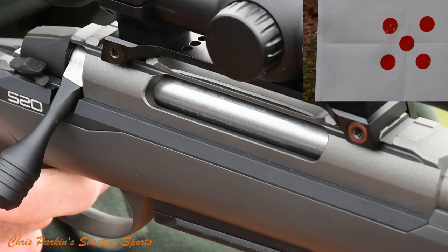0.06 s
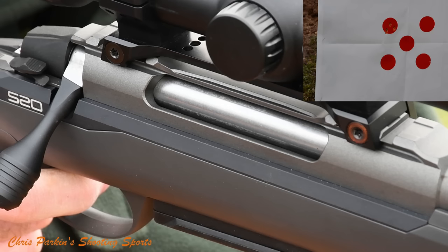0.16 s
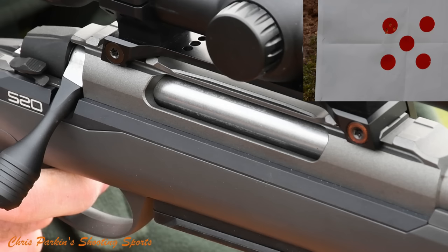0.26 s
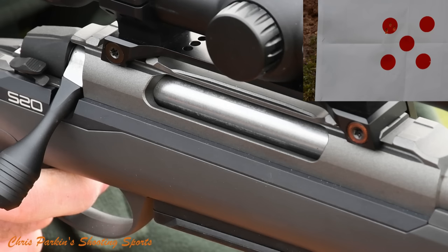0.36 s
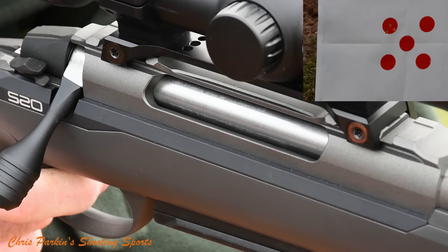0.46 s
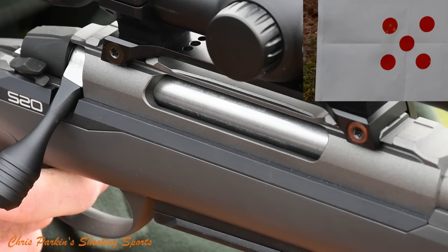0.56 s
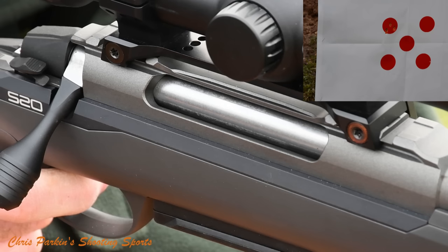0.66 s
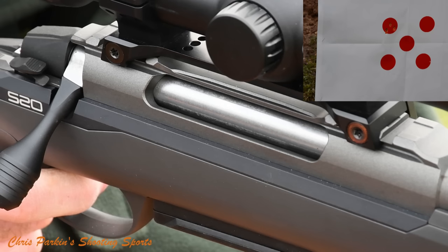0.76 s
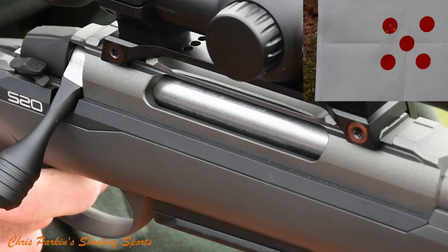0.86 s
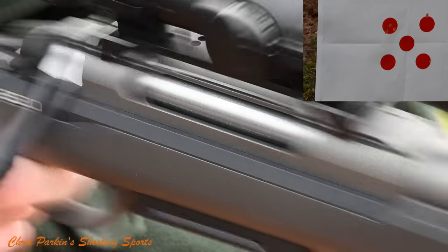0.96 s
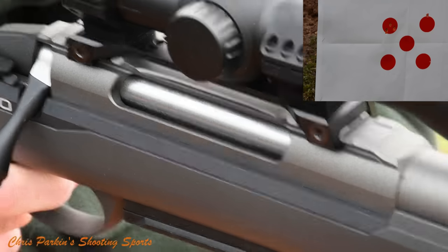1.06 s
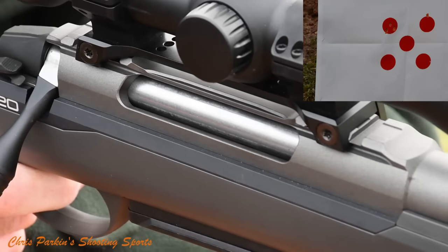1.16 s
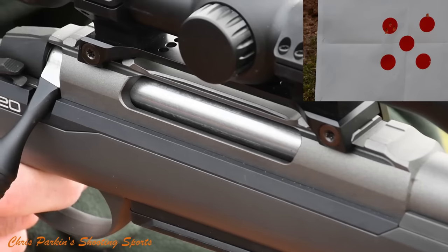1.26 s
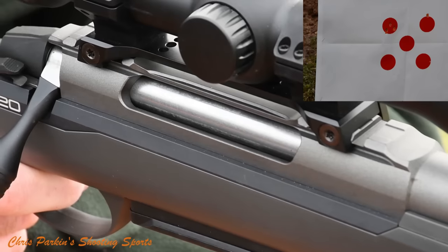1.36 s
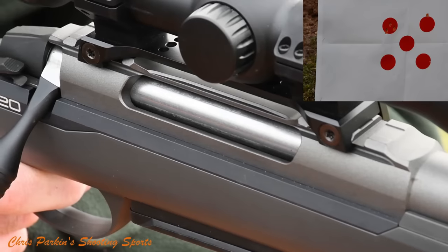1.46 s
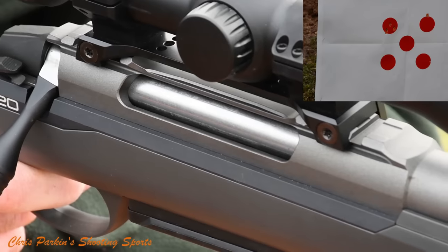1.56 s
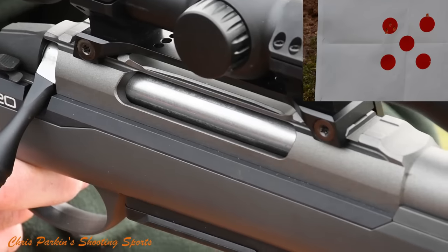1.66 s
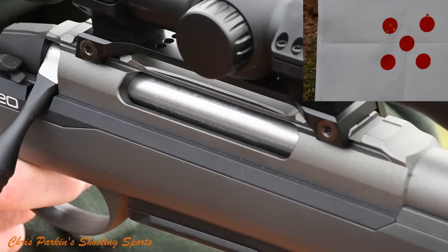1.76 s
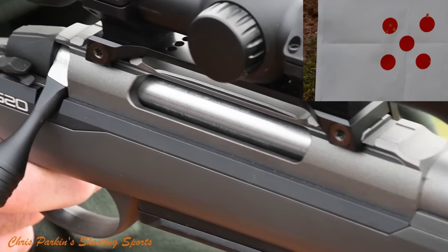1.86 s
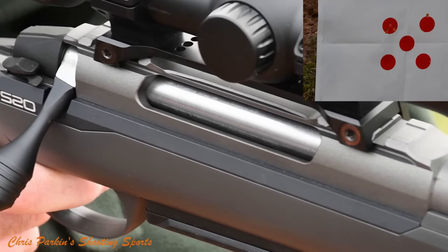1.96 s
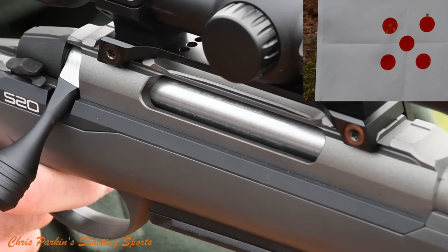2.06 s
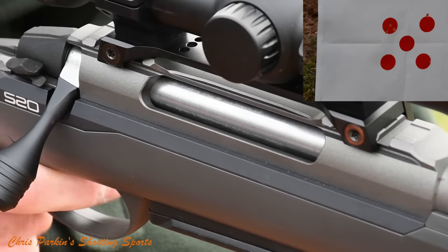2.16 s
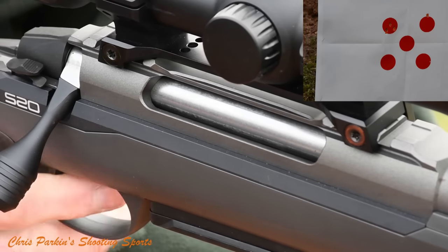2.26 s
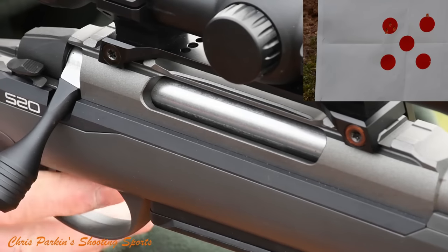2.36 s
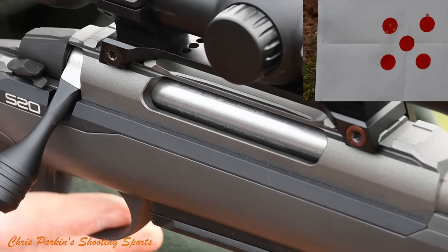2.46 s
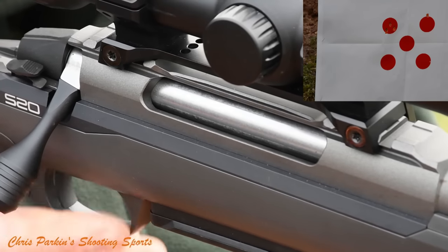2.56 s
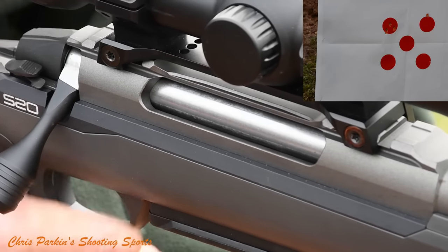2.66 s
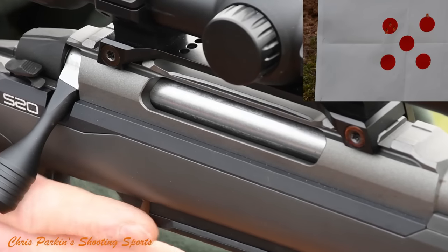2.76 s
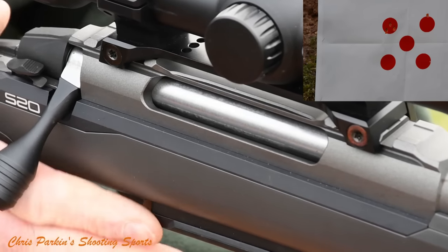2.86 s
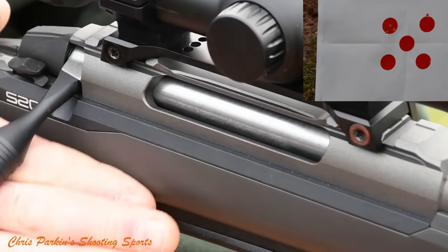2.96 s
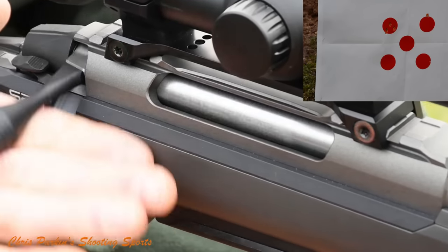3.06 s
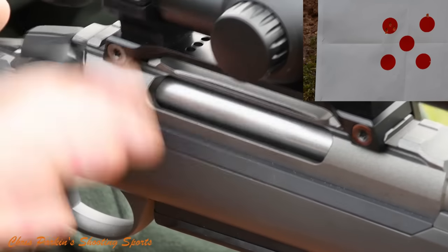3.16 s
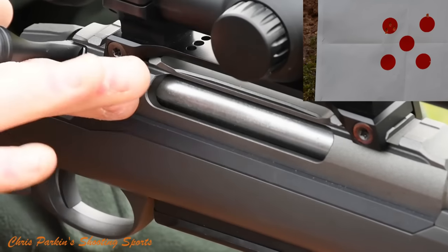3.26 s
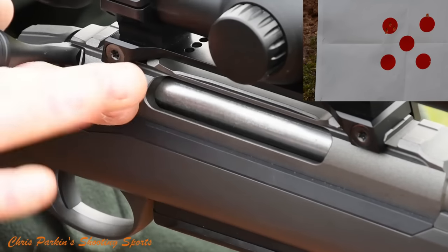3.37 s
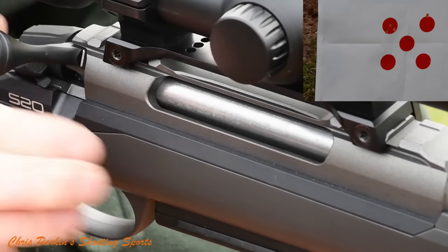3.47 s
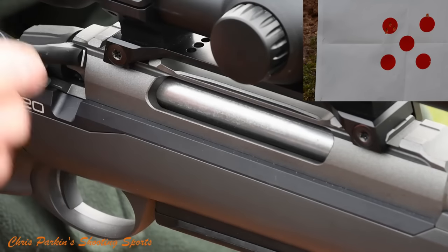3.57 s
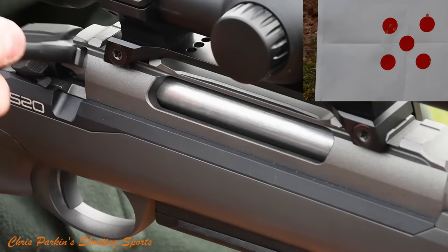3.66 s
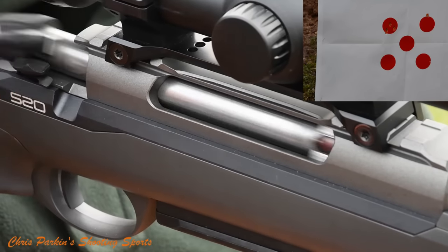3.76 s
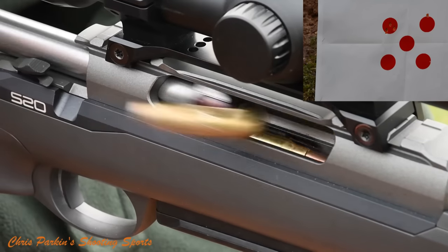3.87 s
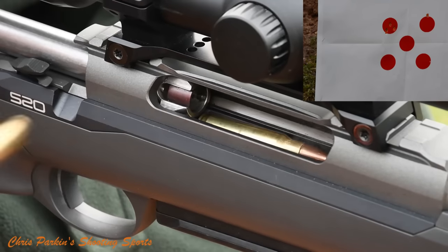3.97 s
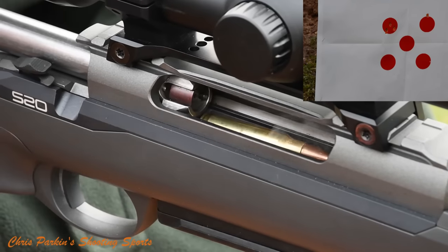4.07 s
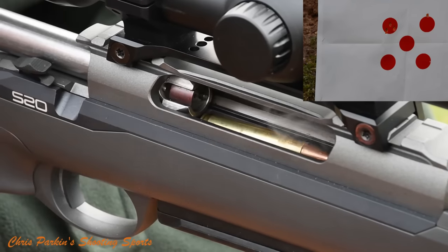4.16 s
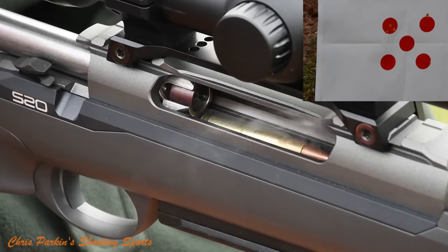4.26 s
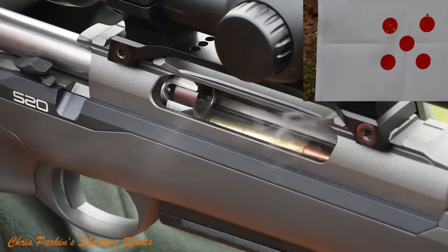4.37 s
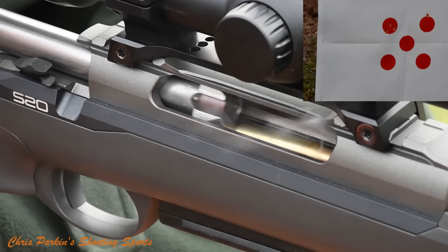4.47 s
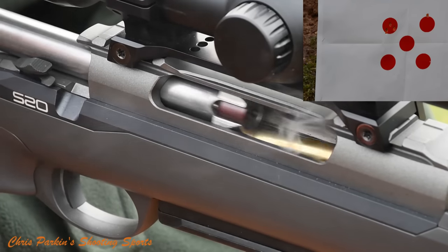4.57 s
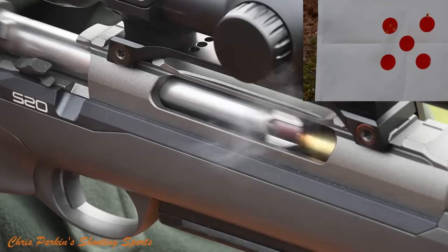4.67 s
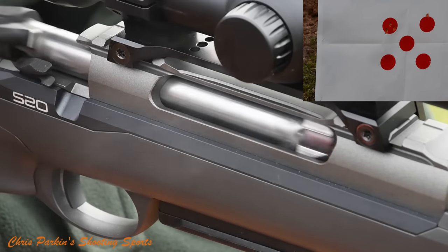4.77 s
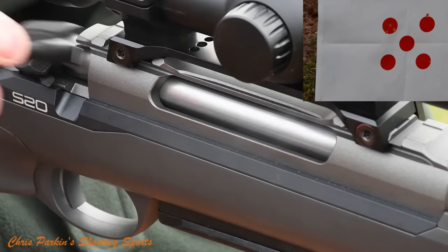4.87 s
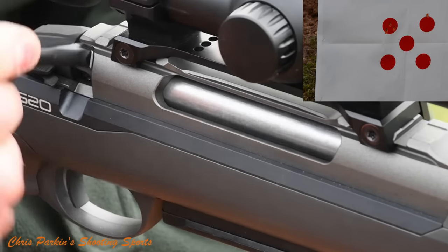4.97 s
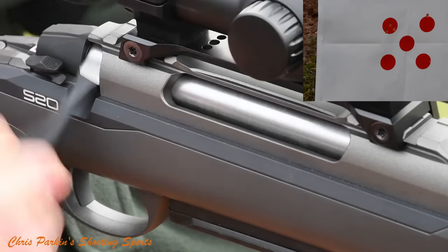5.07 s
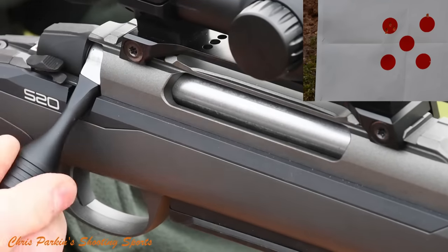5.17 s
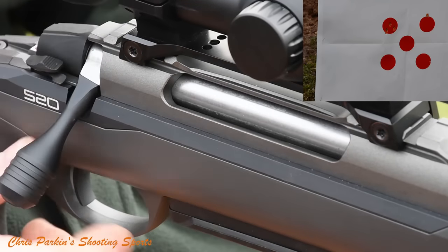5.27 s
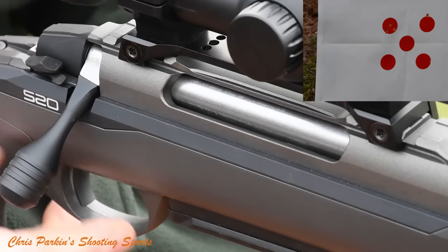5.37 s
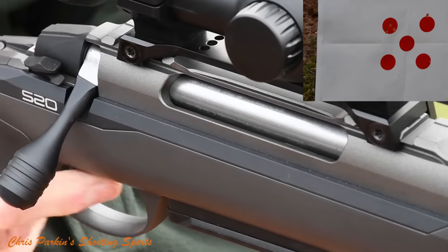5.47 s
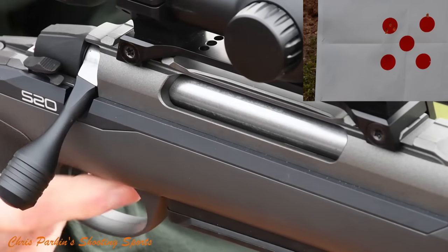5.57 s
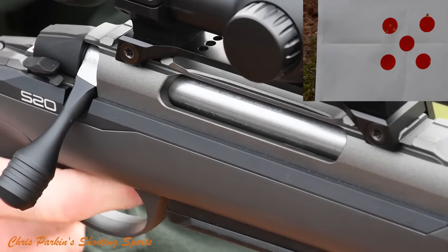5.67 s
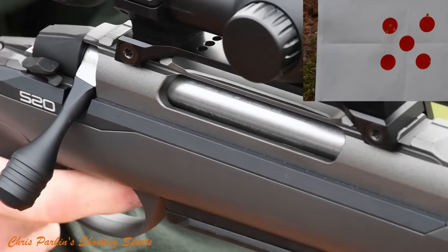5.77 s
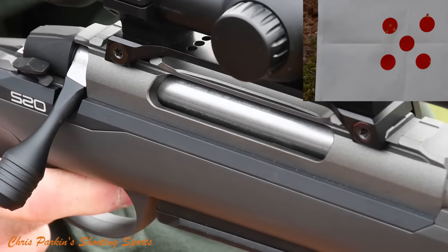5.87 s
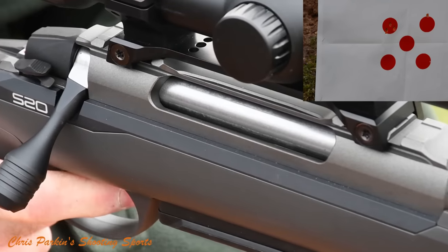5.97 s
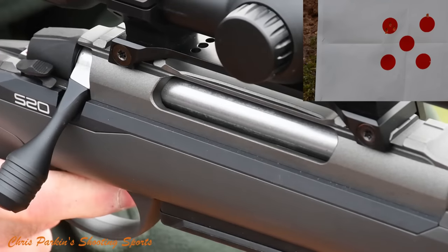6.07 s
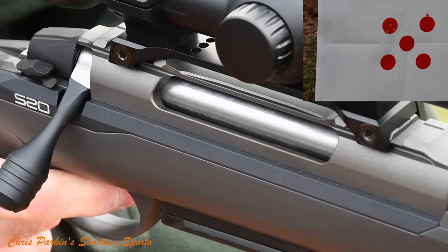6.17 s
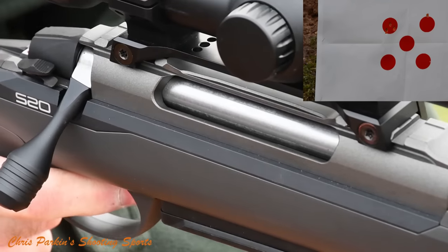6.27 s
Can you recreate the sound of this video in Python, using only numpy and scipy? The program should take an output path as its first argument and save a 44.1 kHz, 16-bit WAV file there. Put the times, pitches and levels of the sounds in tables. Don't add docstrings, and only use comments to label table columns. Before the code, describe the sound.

Outdoors, a low distant traffic hum for a second, then a violent close rifle shot that overloads the microphone. Echoes slap back and roll off, with a dull thud half a second later. Light metal ticks of handling follow, then a hard bolt-lift clack, a sharp clack as it is drawn back, the empty case knocking down, and a sliding, clicking push home ending in a firm lock.

```python
import sys
import numpy as np
from scipy import signal
from scipy.fft import rfft, irfft
from scipy.io import wavfile
from scipy.ndimage import map_coordinates

SR = 44100
rng = np.random.default_rng(int(sys.argv[2]) if len(sys.argv) > 2 else 0)


def generate_wav(sig):
    pcm = np.round(np.clip(np.atleast_2d(sig).T, -1, 1) * 32767).astype(np.int16)
    wavfile.write(sys.argv[1], SR, pcm)


def decibels_to_gain(level_db):
    exponent = np.asarray(level_db, float) / 20
    return 10 ** exponent


N = 279153
SHOT_S = 1.003

# f/Hz, level/dB
LUGS = [(646, -9), (1130, -1), (1293, -6), (1862, 0), (2100, -2)]
STOP = [(775, 2), (1000, -11), (1245, -7), (1440, -11), (1700, -8), (2060, -4)]
BENCH = [(480, -9), (590, -11), (694, -3), (820, -5), (1100, 0), (1390, -9)]
LEVER = [(520, -16), (802, -3), (1040, -5), (1430, -5), (1680, -2)]
MOUTH = [(760, -10), (1210, -8), (1530, -3), (1780, -1), (2700, -5), (3250, -11)]
BREECH = [(930, -3), (1200, 2), (1780, -8), (2970, 0), (4480, -6)]


def noise(count=N):
    return rng.standard_normal(count)


def fade(t, t60):
    return np.exp(-np.log(1000) * t / t60)


def band(x, hz, octaves, order=1):
    edges_hz = np.clip([hz * 2 ** (-octaves / 2), hz * 2 ** (octaves / 2)], 10, .49 * SR)
    return signal.sosfilt(signal.butter(order, edges_hz, "bandpass", fs=SR, output="sos"), x)


def coloured(points, count=N):
    hz, db = np.transpose(points)
    bins_hz = np.arange(1, count // 2 + 2) * SR / count
    gain = decibels_to_gain(np.interp(np.log(bins_hz), np.log(hz), db))
    x = irfft(rfft(noise(count=count)) * gain, count)
    return x / x.std()


def walk(rate_hz):
    return map_coordinates(noise(count=1024), [np.arange(N) * (rate_hz / SR)], order=1, mode="wrap")


def add(out, s, x):
    i = int(s * SR)
    out[i:i + len(x)] += x[:N - i]


def peak(x, db):
    return x * decibels_to_gain(db) / np.abs(x).max()


def land():
    # f/Hz, level/(dB per Hz)
    traffic = [(20, -20.5), (32, -17), (48, -8), (64, 2.5), (90, -4.5), (130, -5), (250, -5.5), (420, -14),
               (700, -13), (1050, -14), (1500, -22), (2200, -31.5), (3300, -37.5), (15000, -41.5)]
    traffic_db, hiss_db = -41.5, -63
    bed = coloured(traffic)
    bass = band(bed, 90, 1.0)
    wandering = bed + bass * (decibels_to_gain(1.9 * walk(5)) - 1)
    far = decibels_to_gain(traffic_db) * wandering * decibels_to_gain(.6 * walk(1.5))
    return far + decibels_to_gain(hiss_db) * band(noise(), 8500, 0.86)


def hollow():
    hum_hz, hum_db, rise_s, t60_s = 330, -57, 1.2, 18
    since_s = np.maximum(np.arange(N) / SR - SHOT_S, 0)
    hum = band(noise(), hum_hz, .16, order=2) * np.minimum(since_s / rise_s, 1) * fade(since_s, t60_s)
    return decibels_to_gain(hum_db) * hum / hum.std()


def roll():
    # t/s, level/dB
    decay = [(1.028, -7.5), (1.09, -20), (1.122, -8), (1.152, -7), (1.165, -11), (1.2, -10), (1.27, -14),
             (1.42, -21), (1.6, -28), (1.8, -36), (2.1, -47.5), (3.0, -57.5), (4.0, -60), (6.3, -64)]
    # f/Hz, level/(dB per Hz)
    spectrum = [(24, -49.5), (40, -20), (265, -4), (449, -5.5), (605, -1), (703, -2.5), (1730, -2),
                (5850, -9), (9300, -20), (15500, -42)]
    air_db_per_s, air_from_s, air_max_db = 18.5, .1, 23
    t, out = np.arange(N) / SR, 0
    ridges_db = 0.7 * walk(30) + 1.4 * walk(200)
    db = np.interp(t, *np.transpose(decay), left=-200)
    air_db = np.minimum(air_db_per_s * (t - SHOT_S - air_from_s), air_max_db)
    scatter = coloured(spectrum)
    for hz in 60 * 2 ** np.arange(0, 8.1, .25):
        part = band(np.roll(scatter, rng.integers(N)), hz, .25, order=2)
        low_loss = .2 * np.clip(np.log2(1100 / hz), 0, 1.5)
        loss_db = air_db * ((hz / 4000) ** 1.6 - 0.3082 + low_loss)
        out = out + part * decibels_to_gain(db - loss_db + ridges_db + 1.2 * walk(50))
    return out


def soft_blows(rows):
    out, t = np.zeros(N), np.arange(SR // 5) / SR
    for s, db, hz, t60 in rows:
        swell = np.minimum(t / 0.0039, 1) ** 2 * fade(np.maximum(t - .005, 0), t60)
        add(out, s, peak(swell * np.sin(2 * np.pi * hz * (t - .0045)), db))
    return out


def berm_thuds():
    # t/s, peak/dB, f/Hz, t60/s
    thuds = [
        (1.4455, -2, 355, 0.0094),
        (1.46, -11, 362, 0.0098),
        (1.468, -16, 430, 0.02),
        (1.621, -21.5, 256, 0.013),
        (1.825, -27.5, 337, 0.02),
        (1.86, -18, 277, 0.016),
        (2.041, -24.5, 258, 0.023),
    ]
    return soft_blows(thuds)


def rifle_rocks():
    # t/s, peak/dB, f/Hz, t60/s
    rocks = [(3.213, -26.5, 90, 0.15), (3.217, -13.5, 338, 0.05), (3.213, -23, 175, .06),
             (3.212, -11, 790, 0.029), (3.216, -18, 440, 0.09), (3.214, -20, 560, .11),
             (3.963, -19.5, 320, 0.067), (4.19, -25.5, 325, 0.043), (4.217, -18, 400, .06),
             (4.684, -36, 128, 0.068), (4.943, -29, 200, .06), (5.1445, -24, 62, .12),
             (5.137, -25, 320, .05), (3.864, -31, 280, .04), (4.215, -26, 230, .06),
             (1.697, -30.5, 170, .03), (1.875, -32.5, 250, .02)]
    return soft_blows(rocks)


def creaks():
    # t/s, peak/dB, f/Hz
    ticks = [(1.915, -41, 7030), (1.989, -41, 6000), (2.035, -44, 3520), (2.245, -50.5, 5000),
             (3.255, -53, 10500), (3.307, -51, 6030), (3.535, -46, 5000), (3.561, -47, 8000),
             (3.609, -45, 6000), (3.628, -46, 9000), (3.633, -44, 5900), (3.775, -46, 8000),
             (5.031, -46, 5470), (4.2405, -24, 8800), (4.349, -40, 8500), (4.378, -43, 6300)]
    out, t = np.zeros(N), np.arange(SR // 10) / SR
    for s, db, hz in ticks:
        add(out, s, peak(band(noise(count=len(t)), hz, .9, order=2) * fade(t, 0.0066), db))
    return out


def brass_case():
    # f/Hz, level/dB, t60/s
    case_modes = [(9006, -7, 0.1), (12010, -1, 0.063), (12040, -13, .14), (14350, -10.5, .045)]
    # t/s, level/dB
    taps = [
        (3.917, -45),
        (3.934, -64),
        (3.951, -43),
        (4.0, -61.5),
        (4.2, -58),
        (4.2175, -31),
    ]
    out, t = np.zeros(N), np.arange(SR // 5) / SR
    ring = sum(decibels_to_gain(db) * np.sin(2 * np.pi * hz * t) * fade(t, t60) for hz, db, t60 in case_modes)
    for s, db in taps:
        add(out, s, decibels_to_gain(db) * ring)
    return out


def sing(out, s, db, hz, t60, rise_s):
    t = np.arange(SR // 5) / SR
    envelope = np.minimum(t / rise_s, 1) * fade(np.maximum(t - rise_s, 0), t60)
    add(out, s, decibels_to_gain(db) * np.sin(2 * np.pi * (hz * t + rng.random())) * envelope)


def singing_steel():
    # t/s, level/dB, f/Hz, t60/s
    pings = [(3.847, -37, 2970, 0.02), (3.868, -39.5, 12900, 0.03), (5.136, -27, 5430, 0.013),
             (3.893, -39, 3000, 0.028), (3.914, -28, 1850, 0.036), (4.638, -31, 2950, .026),
             (4.638, -48, 5970, 0.02), (4.695, -30, 6160, .034), (4.795, -42, 6150, .03),
             (1.624, -23, 1450, .03), (2.044, -36, 1480, .025), (1.254, -8, 1750, .03),
             (5.156, -33, 2650, 0.018), (5.062, -30, 330, .04), (5.182, -30, 1750, .03),
             (4.686, -25, 6000, .02), (2.995, -39, 5680, .02), (1.504, -26, 4900, .014),
             (1.532, -22, 950, .02), (3.209, -23, 4500, .014), (3.2145, -13, 6300, .014),
             (3.205, -30, 5800, .014), (3.965, -24, 5975, .022), (3.951, -33, 3750, .02),
             (4.7345, -31, 6400, .025), (4.736, -44, 4500, .04), (4.709, -40, 3750, .016),
             (4.9415, -22, 2980, .018), (5.005, -31, 900, .025), (5.079, -33, 2050, .035),
             (5.136, -20, 4800, .014), (5.322, -36, 1150, .03)]
    out = np.zeros(N)
    for s, db, hz, t60 in pings:
        sing(out, s, db, hz, t60, .1 * t60)
    return out


def struck_parts():
    # t/s, level/dB, part struck
    blows = [(2.993, -22.5, BENCH), (3.215, -7, LUGS), (3.8655, -18, LUGS), (3.9627, -10, STOP),
             (4.189, -15, BENCH), (4.2163, -7, MOUTH), (4.2403, -38, MOUTH), (4.684, -20, STOP),
             (4.9445, -21, BREECH), (5.0623, -38, LUGS), (5.1355, -10, LEVER)]
    t60_at_1khz_s, slope, rise_s = .05, .8, .00086
    out = np.zeros(N)
    for s, db, part in blows:
        for hz, mode_db in part:
            t60 = t60_at_1khz_s * min(1000 / hz, 1.2) ** slope
            sing(out, s, db + mode_db, hz, t60, rise_s)
    return out


def slides():
    # start/s, end/s, level/dB, f/Hz
    drags = [(3.204, 3.226, -29, 3000), (3.222, 3.263, -61, 1200), (3.913, 3.935, -41.5, 4010),
             (3.637, 3.646, -41, 1500), (3.722, 3.733, -44, 1200), (3.45, 3.459, -42, 1400),
             (3.951, 3.962, -42, 2460), (3.972, 3.99, -37, 1900), (4.263, 4.272, -38, 1300),
             (4.638, 4.662, -40, 1500), (4.679, 4.704, -24.5, 1500), (4.704, 4.719, -32, 1000),
             (4.719, 4.733, -31, 1000), (4.707, 4.718, -44, 3800), (4.735, 4.753, -36, 1300),
             (4.684, 4.712, -38, 5000), (4.792, 4.815, -50, 4000), (4.79, 4.818, -40.5, 1200),
             (4.9405, 4.952, -25, 3200), (4.95, 4.968, -37, 1300), (4.987, 5.026, -44, 1500),
             (5.09, 5.11, -38, 500), (5.14, 5.156, -35, 1300), (5.18, 5.193, -42, 1000),
             (5.6, 5.7, -52, 1500), (4.279, 4.285, -48, 3000), (4.673, 4.685, -33, 1300),
             (4.673, 4.685, -40, 4500), (4.734, 4.748, -40, 5000), (5.062, 5.074, -42, 3000),
             (5.08, 5.09, -44, 4000), (5.091, 5.105, -43, 2400), (5.002, 5.012, -44, 4000),
             (5.183, 5.198, -40, 1700), (3.976, 3.99, -45, 6500), (3.865, 3.876, -33, 5000),
             (5.6, 5.7, -60, 5000), (5.8, 5.92, -61, 6000), (3.632, 3.645, -46, 3500)]
    out, t = np.zeros(N), np.arange(SR // 8) / SR
    for start, end, db, hz in drags:
        ticks = noise(count=len(t)) * decibels_to_gain(np.minimum(6.2 * rng.exponential(size=len(t)), 20))
        drag = band(band(ticks, hz, 1.2, order=2), hz, 2.1, order=2)
        stroke = np.sin(np.pi * np.minimum(t / (end - start), 1) ** .6)
        add(out, start, decibels_to_gain(db) * drag / drag.std() * stroke)
    return out


def steel_crack(t, grit, hz, t60):
    steel_hz = [2970, 3800, 4500, 5400, 6150, 7300, 8800, 12500]
    steel = np.array(steel_hz)[:, None]
    place = decibels_to_gain(1.2 * rng.standard_normal())
    crack = band(grit, hz, 1.42, order=2)
    crack = crack + 0.4 * band(grit, hz * place, .12) + .14 * band(grit, 9500, 1.2, order=2)
    luck = grit[:2 * len(steel)].reshape(2, -1, 1) * decibels_to_gain(-7.0 * np.log2(steel / hz) ** 2 - 18)
    angle = 2 * np.pi * steel * t
    crack = crack + (luck[0] * np.sin(angle) + luck[1] * np.cos(angle)).sum(axis=0)
    return crack * (fade(t, .36 * t60) + .012 * fade(t, .9 * t60))


def stock_knock(t, grit, hz, t60):
    stock_hz = [335, 560, 780, 990, 1250, 1510, 1830, 2070, 2430, 2900]
    modes = np.array(stock_hz)[:, None]
    phases = 2 * np.pi * rng.random((len(modes), 1))
    share = decibels_to_gain(-6.0 * np.log2(modes / hz) ** 2 - 8)
    rings = share * np.sin(2 * np.pi * modes * t + phases) * fade(t, t60 * (1000 / modes) ** .4)
    own = 0.53 * np.sin(2 * np.pi * hz * t) * fade(t, 1.7 * t60)
    rattle = 3.7 * band(grit, hz, 1.05, order=2) * fade(t, .9 * t60)
    return own + rings.sum(axis=0) + rattle


def bolt():
    # t/s, crack peak/dB, knock peak/dB, knock f/Hz
    impact = [
        (1.5045, -15, -14, 2170),
        (1.5084, -22, -22, 1290),
        (1.5154, -23, -22.5, 1050),
    ]
    opening = [(2.9931, -24, -19.5, 1050), (3.2038, -24, -9, 1150), (3.2095, -15, -13, 1930),
               (3.2144, -7, -5, 1270), (3.216, -6, 0, 1227), (3.2912, -20, -24, 2900),
               (3.706, -33, -30, 2400), (3.7254, -44, -34.5, 757), (3.8472, -45, -38, 1900),
               (3.865, -16, -22, 2700), (3.9146, -36, -29, 1830), (3.9214, -35, -32, 1820),
               (3.9264, -32, -38, 1060), (3.9504, -29, -18, 1660), (3.9624, -4, -8, 766),
               (3.9674, -23, -13, 2400)]
    landing = [
        (4.19, -33, -11, 900),
        (4.2163, -22, -10, 1200),
        (4.2214, -36, -15, 1500),
        (4.2403, -27, -14, 520),
        (4.2807, -51.5, -37, 730),
        (4.3485, -33, -29, 1570),
        (4.3779, -36, -34.5, 880),
    ]
    closing = [(4.6384, -51, -40, 1093), (4.6594, -39.5, -28.5, 1700), (4.6724, -30, -24, 900),
               (4.6838, -13.5, -10, 900), (4.6884, -11, -8, 1020), (4.6964, -26, -23, 660),
               (4.7346, -28.5, -26, 1003), (4.7935, -37, -31, 750), (4.8064, -36, -26, 800),
               (4.9405, -25, -26, 1500), (4.9445, -14, -15, 853), (4.9876, -43, -28, 820),
               (5.005, -33, -30, 2400), (5.0629, -33, -26, 1287), (5.0789, -22.5, -27, 2030),
               (5.1204, -49, -32, 1140), (5.1355, -8.5, -6.5, 1100), (5.1544, -39, -28, 1150),
               (5.1804, -53, -23, 1180), (5.3224, -51.5, -30, 831), (5.9085, -44.5, -26.5, 1243),
               (5.9794, -48, -34, 749)]
    # t/s, crack peak/dB, crack f/Hz
    touches = [(1.965, -40, 4200), (2.0078, -31, 5730), (2.1076, -30.5, 5100), (2.1156, -32, 6280),
               (2.126, -39.5, 6460), (2.2767, -42, 6460), (2.479, -43, 5550), (2.5232, -35, 5420),
               (2.6145, -43, 6490), (2.7766, -39, 6830), (2.811, -36, 6800), (2.951, -43.5, 7310),
               (3.0385, -37.5, 4760), (3.4501, -34, 3000), (3.4979, -43.5, 6320), (3.5997, -31, 5080),
               (3.6371, -33, 2800), (3.6671, -36, 8170), (3.692, -41.5, 4230), (3.8357, -33.5, 7060),
               (3.8935, -39, 3170), (3.9814, -40, 5500), (4.7074, -39, 4160), (4.7214, -38, 4650),
               (4.7571, -30.5, 3950), (4.9282, -48, 4510), (5.2165, -33, 4000), (3.8675, -19, 4300),
               (5.066, -34, 4500)]
    knock_t60_s, longer_per_db = .018, .22
    stages = (impact, 6800), (opening, 5000), (landing, 2900), (closing, 4800)
    rows = [(*row, crack_hz) for table, crack_hz in stages for row in table]
    rows += [(s, db, db - 10, 600, hz) for s, db, hz in touches]
    out, t = np.zeros(N), np.arange(SR // 10) / SR
    for s, crack_db, knock_db, knock_hz, crack_hz in rows:
        t60 = knock_t60_s * decibels_to_gain(longer_per_db * np.clip(knock_db + 30, -3, 21))
        onset = np.minimum(t / (0.056 * t60), 1)
        grit = noise(count=len(t))
        crack = steel_crack(t, grit, crack_hz, t60) * onset
        knock = stock_knock(t, grit, knock_hz, t60) * onset
        level_db = min(knock_db + 1, .75 * knock_db - 4.5)
        add(out, s, peak(crack, crack_db) + peak(knock, level_db))
    return out


def firing_pin():
    out, ramp = np.zeros(N), np.arange(SR // 500)
    add(out, SHOT_S - .002, peak(band(noise(count=len(ramp)), 800, 1.2, order=2) * ramp, -22))
    return out


def blast():
    # t/s, level/dB, t60/s, centre f/Hz
    echoes = [(1.0028, 14.5, .039, 750), (1.004, 0, .04, 3500), (1.008, 7.5, .07, 6000),
              (1.012, 10, .04, 260), (1.02, 6, .045, 5500), (1.028, 4, .042, 1000), (1.032, 3.5, .071, 400),
              (1.029, -18, .29, 80), (1.043, -5.5, .14, 2783), (1.062, -8.5, .052, 1800),
              (1.06, -13.5, .22, 353), (1.109, -6.5, .3, 2950), (1.085, -21, .45, 7500),
              (1.12, -13.5, .11, 1100), (1.139, -6, .08, 2300), (1.142, -11.5, .061, 400),
              (1.176, -12, .3, 2800), (1.19, -13, .15, 600), (1.203, -13, .4, 1500),
              (1.252, -2, .045, 1750), (1.252, -19.5, .05, 5500), (1.53, -18, .051, 1000),
              (1.624, -24.5, .04, 1400), (2.042, -40, .043, 1440)]
    swell_share = .035
    out, t = np.zeros(N), np.arange(SR) / SR
    for s, db, t60, hz in echoes:
        burst = band(band(noise(count=len(t)), hz, 1.0), hz, 3.7)
        swell = 1 - np.exp(-t / (swell_share * t60))
        add(out, s, decibels_to_gain(db) * burst / burst.std() * swell * fade(t, t60))
    return out


def scene():
    background = land() + hollow() + roll() + berm_thuds()
    handling = rifle_rocks() + creaks() + brass_case() + singing_steel() + struck_parts() + slides() + bolt()
    return (background + handling + firing_pin() + blast())[None]


def low_pass(x):
    return signal.sosfilt(signal.butter(12, 15620, fs=SR, output="sos"), x)


def record(dry):
    mix = np.clip(dry, -1, 1)
    return low_pass(mix)


dry = scene()
out = record(dry)
generate_wav(out)
```